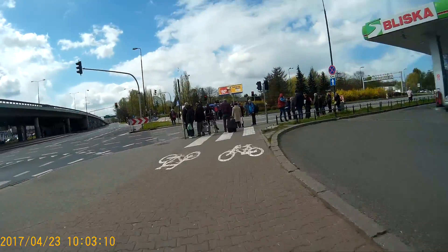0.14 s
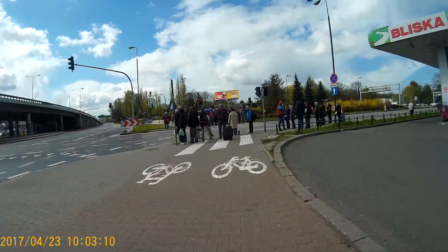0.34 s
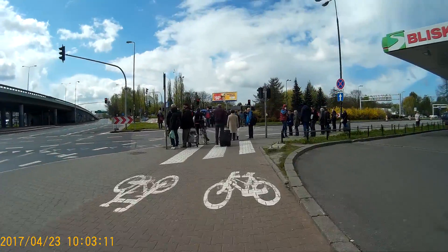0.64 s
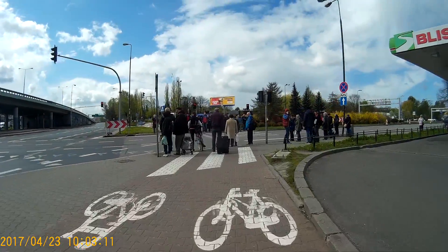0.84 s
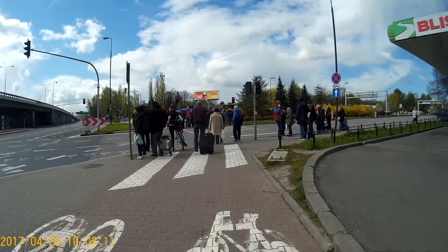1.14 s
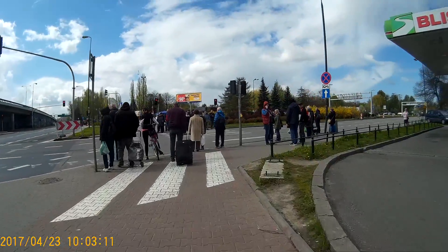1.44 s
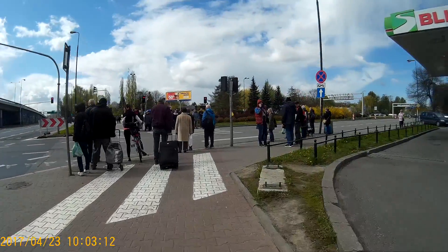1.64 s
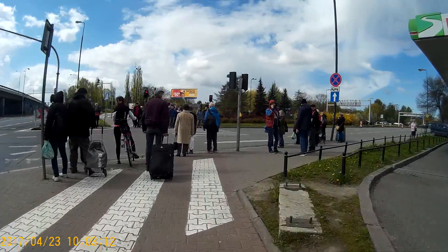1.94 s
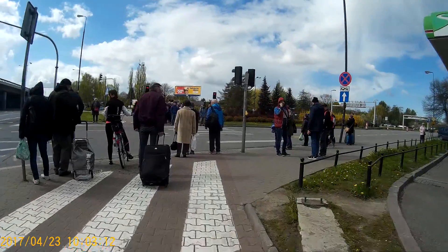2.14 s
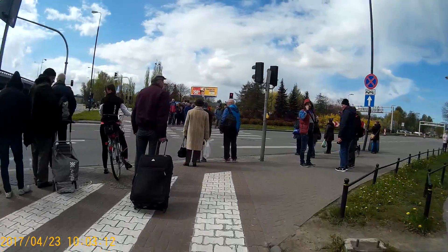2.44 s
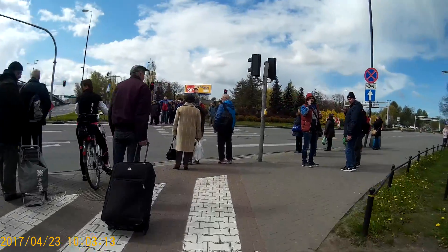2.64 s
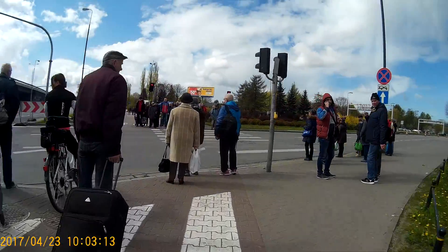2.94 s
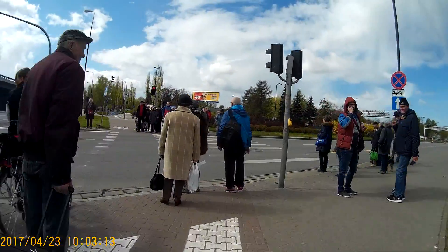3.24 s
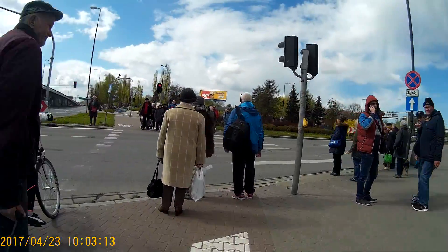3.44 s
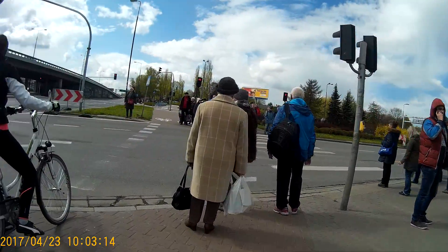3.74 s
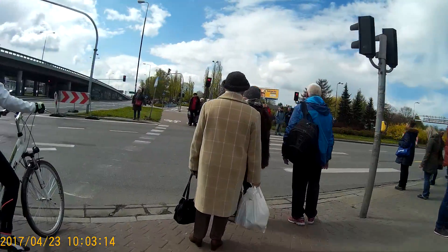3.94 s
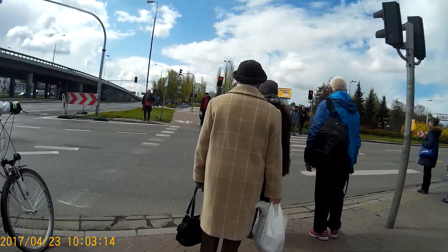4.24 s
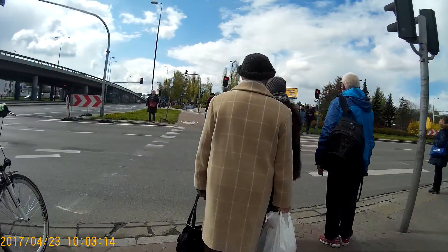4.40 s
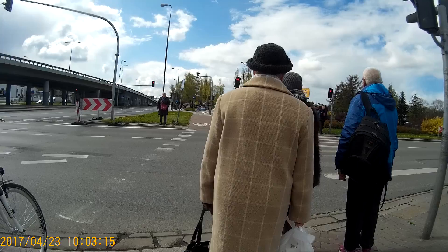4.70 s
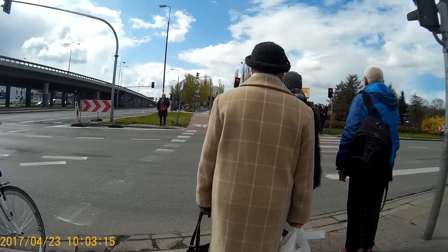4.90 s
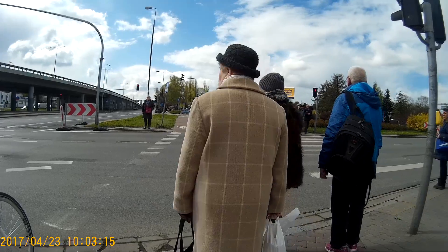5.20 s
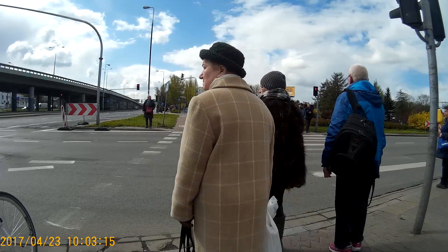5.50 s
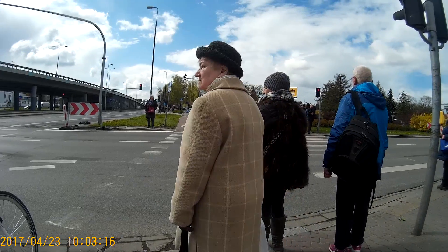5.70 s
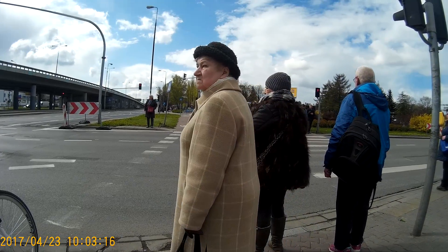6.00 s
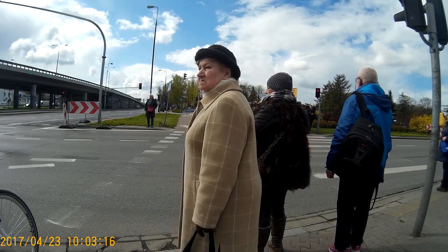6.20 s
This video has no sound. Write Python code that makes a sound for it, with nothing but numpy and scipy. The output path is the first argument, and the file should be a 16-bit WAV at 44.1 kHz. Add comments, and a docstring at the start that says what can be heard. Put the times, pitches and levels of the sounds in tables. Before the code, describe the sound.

Outdoors on a paved street, a camera fixed to a rolling bicycle rattles hard in its plastic mount, sharp clacks mixed with dull knocks over low wind and road rumble. The clatter thins as the bike slows, then stops. Just before rest the frame shudders with a brief low wavering tone, clunks, and a soft thud follows. Only faint distant traffic and fine hiss remain.

```python
"""On a street of paving blocks, a bicycle carrying a camera rolls along, slows and stops at a crossing.
The camera rattles in its plastic mount: sharp clacks one way, dull knocks the other, built from fading tones.
Road, wind, tyres and traffic are shaped noise; the road and tyre noise dies down with the ride.
At the stop the frame shudders with a low wavering tone and clunks, a soft thud follows, and faint traffic remains."""
import sys
import numpy as np
from scipy import signal
from scipy.fft import rfft, irfft, next_fast_len
from scipy.io import wavfile
from scipy.ndimage import uniform_filter1d

SR = 44100
rng = np.random.default_rng(int(sys.argv[2]) if len(sys.argv) > 2 else 0)


def int16_out(signal):
    """Quantize to a 16-bit WAV file."""
    q = np.round(np.clip(np.atleast_2d(signal).T, -1, 1) * 32767)
    wavfile.write(sys.argv[1], SR, q.astype(np.int16))


N = 280211
TIME = np.arange(N) / SR  # seconds

# Levels in the tables are relative: the functions below add their own trims.

# distant traffic, its balance of low and high: (frequency [Hz], level [dB])
TRAFFIC_COLOUR = [(12, -42.5), (20, 5.5), (173, -3), (401, -7), (484, -6.5), (871, -16.5), (1030, -13),
                  (1120, -19.5), (1630, -14.5), (2760, -24), (3000, -25.5), (3900, -58), (6600, -120)]
# fine hiss: (frequency [Hz], level [dB])
HISS_COLOUR = [(1500, -4.5), (3000, 2), (5000, 0.5), (8000, -1), (12000, -2), (15000, -3), (16400, -12)]
# rumble of the shaken mount: (frequency [Hz], level [dB])
RUMBLE_COLOUR = [(8.8, -45.5), (15, -9), (27, -11), (42, -6.5), (56, 0), (72, 1.5), (92, -3.5),
                 (125, -11.5), (154, -13), (201, -9.5), (255, -16.5), (314, -25.5), (375, -32), (442, -47),
                 (520, -39), (680, -72), (1140, -120)]
# rolling tyres: (frequency [Hz], level [dB])
TYRE_COLOUR = [(240, -26.5), (400, -2.5), (543, -11), (713, -10), (808, 0.5), (874, -7.5), (1130, -9),
               (1270, -13.5), (1390, -15), (1740, -9.5), (2040, -20), (2480, -25), (3250, -32), (6000, -44),
               (7800, -65.5), (13200, -120)]
# buzz of the mount while the frame shudders: (frequency [Hz], level [dB])
BUZZ_COLOUR = [(700, -31.5), (770, -19), (793, 4), (820, -18), (950, -14), (1300, -25.5), (1800, -23),
               (2600, -42)]

# the ride dies down as the bicycle slows: (time [s], road and wind rumble [dB], tyre noise [dB])
RIDE = [(0, -20.5, -47), (.42, -18, -40.5), (.8, -23.5, -46.5), (1.35, -21.5, -47), (2.25, -24, -50.5),
        (2.55, -25.5, -53), (3.4, -28.5, -56.5), (3.7, -30, -57), (4.05, -36.5, -62), (4.22, -32.5, -56.5),
        (4.52, -39.5, -64), (5.15, -49, -62.5), (5.35, -54.5, -71.5), (5.85, -67, -74.5),
        (6.35, -71, -76.5)]
# soft lurches as the bicycle creeps and settles: (time [s], level [dB])
LURCHES = [(3.52, -25), (4.78, -35), (4.98, -42), (5.09, -41), (5.51, -40), (5.69, -56)]
# brake pads rubbing, a single row: (start [s], end [s], fade [s])
BRAKE_RUB = (4.68, 4.96, 0.077)
# jolts of the frame as the bicycle comes to rest: (time [s], level [dB], extra treble [dB])
JOLTS = [(4.627, -37.5, -3), (4.7395, -14, 2), (4.7455, -20, -10), (4.7505, -22, -7)]
# dull thuds, perhaps a pedal stroke and the rider's foot coming down: (time [s], level [dB], extra treble [dB])
THUDS = [(4.188, -40, -5), (4.953, -28.5, 3), (4.9612, -24.5, -8), (4.968, -32, -2)]
# camera striking the hard side of its mount: (time [s], level [dB], extra treble [dB])
CLACKS = [(0.001, -5, 3), (0.0301, -5, 7.5), (0.1075, -2, 3.5), (0.1442, -3.5, 6), (0.2865, -6.5, 3),
          (0.3014, -12, 2.5), (0.3172, -8, 0), (0.4, -23, -3), (0.4339, -18, -9), (0.478, -5, 0.5),
          (0.5685, -8, -0.5), (0.5989, -5, 2), (0.6363, -4.5, 5.5), (0.6849, -1.5, -1.5),
          (0.6962, -4.5, 1.5), (0.7367, -15, -5), (0.7819, -17, -1), (0.8499, -6.5, 1), (0.9068, -0.5, -5),
          (0.9236, -10, -11), (0.9546, -1, -2.5), (0.9668, -13, -10), (1.011, -21, -7), (1.093, -12, -2.5),
          (1.1466, -15.5, -3), (1.2868, -22.5, 0), (1.3161, -12.5, -2), (1.4004, -22, -14),
          (1.4597, -8, 1.5), (1.4906, -5.5, 1.5), (1.5366, -8, -1), (1.5798, -9.5, -1.5),
          (1.6519, -12.5, -4), (1.6648, -13.5, -1), (1.7801, -6, 3.5), (1.8631, -9.5, -2),
          (1.9353, -17.5, -11), (1.9671, -26, -1), (2.031, -14.5, -13), (2.0999, -13.5, -1),
          (2.1844, -15.5, 0.5), (2.2587, -23.5, -5), (2.331, -17.5, -3), (2.5464, -15, -11),
          (2.6362, -26, -6), (2.6993, -24.5, -2), (2.7432, -8, 0), (2.8385, -7, 1.5), (2.926, -5.5, 0.5),
          (2.9499, -15.5, -1), (2.981, -21.5, -11), (3.0538, -4, 0), (3.1601, -7.5, 1.5), (3.2337, -15, -6),
          (3.5118, -34, -9), (3.5909, -11, -1), (4.6639, -18.5, -5), (4.7218, -30, -6)]
# camera falling back on the soft side: (time [s], level [dB], extra treble [dB])
KNOCKS = [(0.0234, -9, -2), (0.0757, -6.5, -10), (0.0857, -24.5, -11), (0.1387, -15, -8),
          (0.1973, -5.5, -16), (0.2086, -13, -6), (0.2124, -6, -5), (0.2235, -11, -12), (0.2351, -26, -5),
          (0.254, -19, -10), (0.2609, -19, -12), (0.4121, -9.5, -16), (0.4609, -17, -4), (0.624, -12, -4),
          (0.6657, -9, -9), (0.676, -14, 0), (0.711, -11.5, -7), (0.811, -18, -4), (0.9311, -11, -3),
          (0.9435, -12, -11), (1.0738, -13.5, -1), (1.0822, -21, -1), (1.572, -18.5, 6.5),
          (1.6443, -15.5, -10), (1.922, -13, -1), (2.005, -17.5, 0), (2.1341, -16.5, -2.5),
          (2.678, -23.5, 3), (2.7335, -11.5, -14), (2.9168, -15.5, -4), (3.1404, -13, -2),
          (3.5798, -20.5, -8)]

# tones of the frame: (frequency [Hz], level [dB], time to fade by 60 dB [s])
FRAME_MODES = [(145.5, -1.5, 0.16), (256.7, -1.5, 0.092), (463, -15, 0.067), (781, -18, 0.12),
               (877, -4.5, 0.089), (1119, -8.5, 0.13), (1350, -1.5, 0.032), (1560, -2, 0.016),
               (1710, -6, .04), (1895, -12, 0.051), (2700, -20, 0.023)]
# tones of the thud: (frequency [Hz], level [dB], time to fade by 60 dB [s])
THUD_MODES = [(200.6, 0.5, 0.158), (293, -2.5, 0.043), (450, -5.5, 0.0325), (800, -20.5, 0.14),
              (930, -14.5, 0.055), (1090, -14.5, 0.033), (1350, -17, 0.092), (1870, -8.5, 0.0091),
              (2770, -30, .02)]
# tones of the hard side: (frequency [Hz], level [dB], time to fade by 60 dB [s])
CLACK_MODES = [(485, -56, 0.097), (652, -22, 0.048), (797.2, -14.5, 0.097), (970, -1, 0.0053),
               (1032, -9, 0.015), (1437, 0.5, 0.013), (1850, 4, 0.0039), (2266, -2, 0.012),
               (2870, -23.5, 0.0056), (3330, -28, 0.01), (4446, -15.5, 0.0062), (5032, -12.5, 0.0056),
               (6180, -17, 0.00472), (6373, -18.5, 0.005), (8930, -29.5, 0.0038), (10450, -41, 0.0031)]
# tones of the soft side: (frequency [Hz], level [dB], time to fade by 60 dB [s])
KNOCK_MODES = [(501, -15, 0.035), (674.5, -14.5, 0.039), (784, -15, 0.079), (906, -6, 0.034),
               (1270, 1.5, 0.0092), (1699, -3.5, 0.015), (1904, -12.5, 0.02), (2580, -13.5, 0.0036),
               (3320, -14, 0.0056), (4700, -16.5, 0.002), (8660, -19.5, 0.0012)]

TRAFFIC_DB = -58.5
BUMP_S, LURCH_S = 0.12, 0.098  # length of the shake around each blow, and of each lurch
GRIP_S, CLUNK_S = 4.62, 4.738  # the brake grips, then the frame clunks and swings freely
SHUDDER_HZ, SHUDDER_RISE_S = 71.7, .024  # centre pitch of the shudder, and how fast it builds
FREE_DROP_DB, FREE_DB_PER_S = -1, 78  # quick drop at the clunk, then the steady fade
EDGE_HZ = 16400  # upper band limit


def gain_of(db):
    """Turns decibels into a multiplier for the wave."""
    return 10 ** (np.asarray(db) / 20)


def evened(x):
    """Scales a sound to an average strength (rms) of 1."""
    return x / np.sqrt(np.mean(x ** 2) + 1e-20)


def add(mix, s, sound):
    """Adds a sound into the mix at time s, cutting off whatever runs past the end."""
    part = mix[max(round(s * SR), 0):][:len(sound)]
    part += sound[:len(part)]


def ramp(start_s, rise_s):
    """Rises from 0 to 1, then holds."""
    return np.clip((TIME - start_s) / rise_s, 0, 1)


def noise(colour):
    """Noise of rms 1, with each frequency made as strong as the table says."""
    hz, db = np.transpose(colour)
    size = next_fast_len(N)
    log_hz = np.log(np.fft.rfftfreq(size, 1 / SR) + 1)
    shape_db = np.interp(log_hz, np.log(hz + 1), db, left=-100, right=-100)
    spectrum = rfft(rng.standard_normal(size)) * gain_of(shape_db)
    return evened(irfft(spectrum, size)[:N])


def drift(per_s):
    """A random wander of rms 1: straight lines between chance values, per_s of them a second."""
    knots = np.arange(0, TIME[-1] + 1, 1 / per_s)
    return evened(np.interp(TIME, knots, rng.standard_normal(len(knots))))


def ring(modes, size=16384):
    """A body's answer to one blow: fading tones, with the energy packed at the start; peak 1."""
    t = np.arange(size) / SR
    wave = np.zeros(size)
    for k, (hz, db, t60) in enumerate(modes):
        wave += (-1) ** k * gain_of(db - 60 * t / t60) * np.sin(2 * np.pi * hz * t)
    # keep the strength of each frequency, but choose the timing that starts soonest (minimum phase)
    log_gain = np.log(abs(np.fft.fft(wave)) + 1e-5)
    wave = np.fft.ifft(np.exp(np.conj(signal.hilbert(log_gain)))).real
    return wave / abs(wave).max()


def strike(rows, modes, treble_hz, chatter, chatter_s, detune=0.064, scatter_db=1.5):
    """Blows on a body: tones vary a little from blow to blow, and a short random chatter roughens each."""
    out = np.zeros(N)
    hz, mode_db, t60 = np.transpose(modes)
    high = signal.butter(1, treble_hz, "high", fs=SR, output="sos")
    t = np.arange(SR // 50) / SR
    all_luck = rng.standard_normal((len(rows), 3, len(t)))
    for (s, db, treble_db), luck in zip(rows, all_luck):
        shift, weight = luck[:2, :len(modes)]
        varied_hz = hz + detune * shift / t60  # quickly fading tones vary more
        body = ring(np.transpose([varied_hz, mode_db + scatter_db * weight, t60]), size=8192)
        bright = body + (gain_of(treble_db) - 1) * signal.sosfilt(high, body)
        contact = (t == 0) + chatter * luck[2] * np.exp(-t / chatter_s)
        add(out, s, gain_of(db) * signal.fftconvolve(bright, contact))
    return out


def swells(rows, width_s):
    """A smooth swell around each event; where they overlap their powers add."""
    power = np.zeros(N)
    arch = np.hanning(int(width_s * SR) + 3)
    for s, db, *_ in rows:
        add(power, s - width_s / 2, gain_of(db) ** 2 * arch)
    return np.sqrt(power)


def motion(bump_shake_db=-18.0, bump_tyre_db=-46):
    """Strength of shake and tyre noise: both follow the ride and swell around each blow; lurches only shake."""
    s, shake_db, tyre_db = np.transpose(RIDE)
    bumps = swells(CLACKS + KNOCKS, BUMP_S)
    lurches = swells(LURCHES, LURCH_S)
    jolting = np.hypot(gain_of(bump_shake_db) * bumps, lurches)
    shake = np.hypot(gain_of(np.interp(TIME, s, shake_db)), jolting)
    roll = np.hypot(gain_of(np.interp(TIME, s, tyre_db)), gain_of(bump_tyre_db) * bumps)
    return shake, roll


def traffic(traffic_db=-1, swell_db=1):
    """Distant road noise: shaped noise whose level wanders gently."""
    return noise(TRAFFIC_COLOUR) * gain_of(TRAFFIC_DB + traffic_db + swell_db * drift(per_s=8.2))


def hiss(shake, still_db=-70.5, moving_db=-66.0, full_shake_db=-23.5):
    """A fine hiss that grows with the shaking, up to a limit."""
    moving = np.minimum(shake / gain_of(full_shake_db), 1)
    return noise(HISS_COLOUR) * np.hypot(gain_of(still_db), gain_of(moving_db) * moving)


def rumble(shake, rumble_db=-1, steadiness=.7):
    """Paving joints and wind keep the mount swaying: mostly low noise that follows the shake."""
    sway = noise(RUMBLE_COLOUR)
    swell = np.sqrt(uniform_filter1d(sway ** 2, SR // 12) + 1e-9)
    steadier = evened(sway / swell ** steadiness)  # its own random surges are partly evened out
    return gain_of(rumble_db) * shake * steadier


def tyres(roll, tyre_db=0, lumpy_db=2.5):
    """Rolling noise made uneven by quick random changes of level."""
    return noise(TYRE_COLOUR) * roll * gain_of(tyre_db + lumpy_db * drift(per_s=40))


def brake(rub_db=-55, rub_hiss_db=-65):
    """The pads rub on the wheel for its last part of a turn: tyre-coloured noise and hiss."""
    start, end, fade = BRAKE_RUB
    squeeze = ramp(start, fade) * (1 - ramp(end - fade, fade))
    return squeeze * (gain_of(rub_db) * noise(TYRE_COLOUR) + gain_of(rub_hiss_db) * noise(HISS_COLOUR))


def shudder(shudder_db=-18.0, overtone_db=-22, waver=0.0229, buzz_db=-47):
    """The braked frame swings at a low pitch and sets the mount buzzing; after the clunk it dies away."""
    phase = 2 * np.pi * np.cumsum(SHUDDER_HZ * (1 + waver * drift(per_s=31))) / SR
    overtones = np.sin(2 * phase) + np.sin(3 * phase)
    swing = np.sin(phase) + gain_of(overtone_db) * overtones
    free_db = FREE_DROP_DB * ramp(CLUNK_S, SHUDDER_RISE_S) - FREE_DB_PER_S * np.maximum(TIME - CLUNK_S, 0)
    strength = ramp(GRIP_S, SHUDDER_RISE_S) * gain_of(free_db)
    buzz = strength ** 2 * noise(BUZZ_COLOUR)
    return gain_of(shudder_db) * strength * swing + gain_of(buzz_db) * buzz


def shudder_ticks(first_s=4.649, jitter_s=.0012, tick_db=-31, scatter_db=3, treble_db=-3):
    """Until the clunk, the camera taps its mount at about the shudder's pace."""
    rows = []
    for s in np.arange(first_s, CLUNK_S, 1 / SHUDDER_HZ):
        when = s + jitter_s * rng.standard_normal()
        level_db = tick_db + scatter_db * rng.standard_normal()
        rows.append((when, level_db, treble_db))
    return -strike(rows, CLACK_MODES, treble_hz=4000, chatter=.04, chatter_s=.0014)


def stop(jolt_db=-1, thud_db=-1):
    """The bicycle shudders, clunks and settles: blows ring the frame and the duller thud."""
    clunk = strike(JOLTS, FRAME_MODES, treble_hz=980, chatter=0.089, chatter_s=0.0036, scatter_db=.5)
    thud = strike(THUDS, THUD_MODES, treble_hz=788, chatter=0.1, chatter_s=0.01, scatter_db=0.0)
    return shudder() + shudder_ticks() - gain_of(jolt_db) * clunk + gain_of(thud_db) * thud


def ticking(shake, per_s=75, tick_db=-23, spread_db=7, most_db=15, full_shake_db=-19, steepness=1.4):
    """Tiny contacts in the mount: more shake makes them stronger and, up to per_s, more frequent."""
    chance = per_s / SR * np.minimum(shake / gain_of(full_shake_db), 1) ** steepness
    hits = rng.random(N) < chance
    extra_db = np.minimum(spread_db * rng.exponential(1, N), most_db)
    blows = hits * shake * gain_of(tick_db + extra_db)
    hard = rng.random(N) < .5  # about half land on each side
    hard_ticks = signal.oaconvolve(blows * hard, ring(CLACK_MODES))
    soft_ticks = signal.oaconvolve(blows * ~hard, ring(KNOCK_MODES))
    return (hard_ticks + soft_ticks)[:N]


def pressure(rows, width_s):
    """The smooth rise and fall of force around each contact."""
    out = np.zeros(N)
    bump = signal.windows.hann(int(width_s * SR) + 3)
    for s, db, _ in rows:
        add(out, s + .001 - width_s / 2, gain_of(db) * bump)
    return out


def scrape(rows, grains_per_s, fade_s):
    """After each contact the case slips a little: a short, dying train of tiny catches."""
    blows = np.zeros(N)
    for s, db, _ in rows:
        add(blows, s + 0.0025, gain_of([db]))
    grip = signal.lfilter([1], [1, -np.exp(-1 / (fade_s * SR))], blows)
    return grip * rng.standard_normal(N) * (rng.random(N) < grains_per_s / SR)


def rebounds(earliest_s=0.01, latest_s=.04, drop_db=-27, scatter_db=3):
    """After each clack the camera bounces back once, faintly."""
    blows = np.zeros(N)
    chances = rng.random(len(CLACKS))
    lucks = rng.standard_normal(len(CLACKS))
    for (s, db, _), chance, luck in zip(CLACKS, chances, lucks):
        delay_s = earliest_s + (latest_s - earliest_s) * chance
        add(blows, s + delay_s, gain_of([db + drop_db + scatter_db * luck]))
    return -signal.oaconvolve(blows, ring(CLACK_MODES))[:N]


def knocks(knock_db=2, push_db=-7, slip_db=-11):
    """The camera falls back on the soft side, with a low push, and scrapes briefly along it."""
    knock = strike(KNOCKS, KNOCK_MODES, treble_hz=3000, chatter=.035, chatter_s=.002)
    catches = scrape(KNOCKS, grains_per_s=450, fade_s=.009)
    slip = signal.oaconvolve(catches, ring(KNOCK_MODES))[:N]
    push = pressure(KNOCKS, width_s=0.013)
    return gain_of(knock_db) * knock + gain_of(slip_db) * slip + gain_of(push_db) * push


def clacks(clack_db=2.5, push_db=-14):
    """The camera snaps against the hard side of its mount, with a low push behind each blow."""
    snap = strike(CLACKS, CLACK_MODES, treble_hz=4000, chatter=.04, chatter_s=.0014)
    return -gain_of(clack_db) * snap - gain_of(push_db) * pressure(CLACKS, width_s=0.01)


def rattle():
    """The camera hits the two sides of its mount; opposite signs stand for opposite directions."""
    return clacks() + knocks() + rebounds()


def scene():
    """Adds every sound together into one channel."""
    shake, roll = motion()
    riding = rattle() + ticking(shake) + rumble(shake) + tyres(roll) + hiss(shake)
    return (riding + traffic() + brake() + stop())[None]


def record(dry, ceiling=0.72):
    """The microphone passes no steady pressure, overloads on the hardest clacks, and cuts the very top."""
    passed = signal.sosfilt(signal.butter(1, 8, "high", fs=SR, output="sos"), dry)
    clipped = passed / (1 + (passed / ceiling) ** 12) ** (1 / 12)  # peaks bend smoothly below the ceiling
    band_limit = signal.firwin(511, EDGE_HZ, window=("kaiser", 9), fs=SR)
    return signal.oaconvolve(clipped, band_limit[None], "same")


dry = scene()
out = record(dry)
int16_out(out)
```